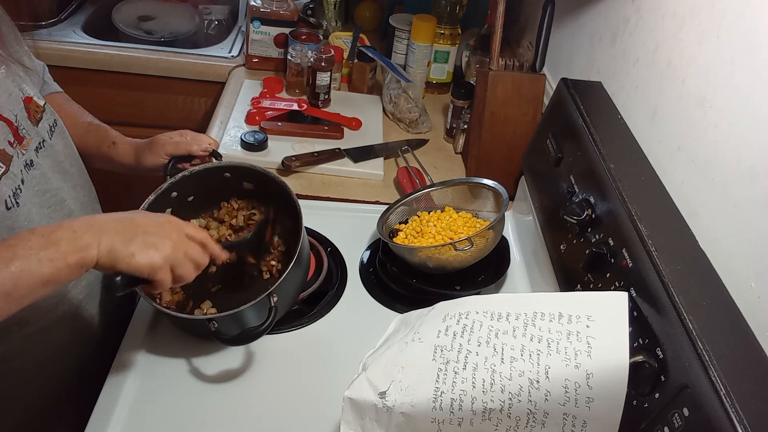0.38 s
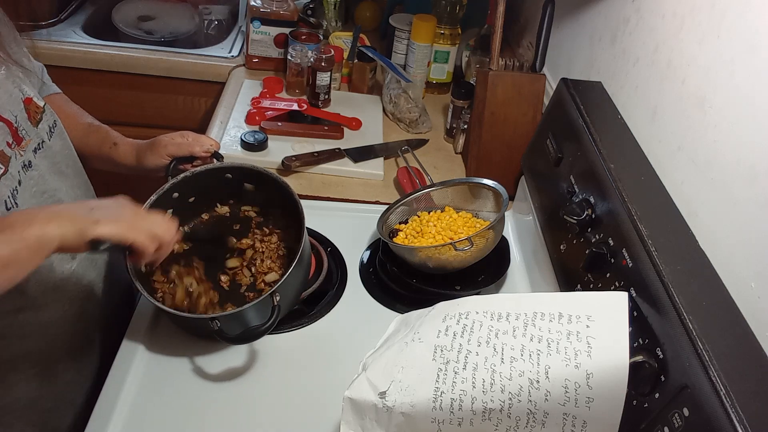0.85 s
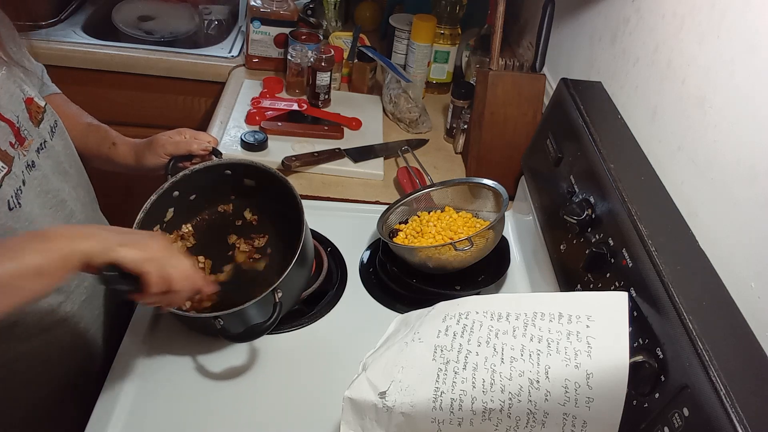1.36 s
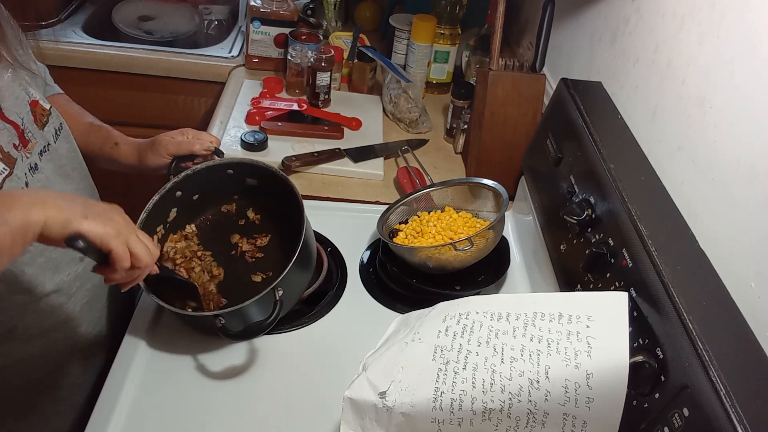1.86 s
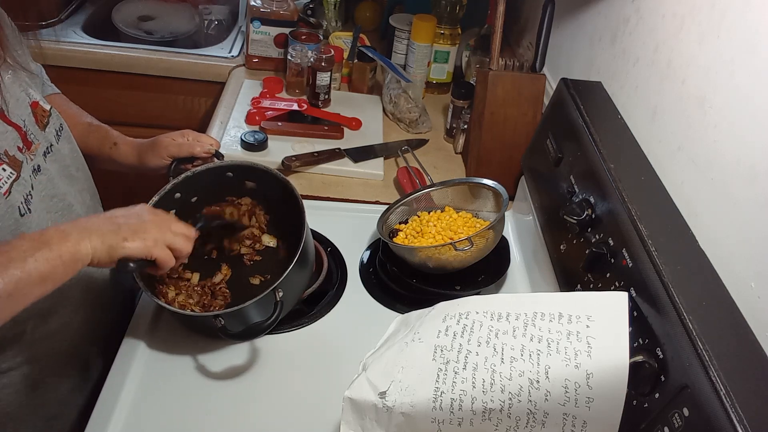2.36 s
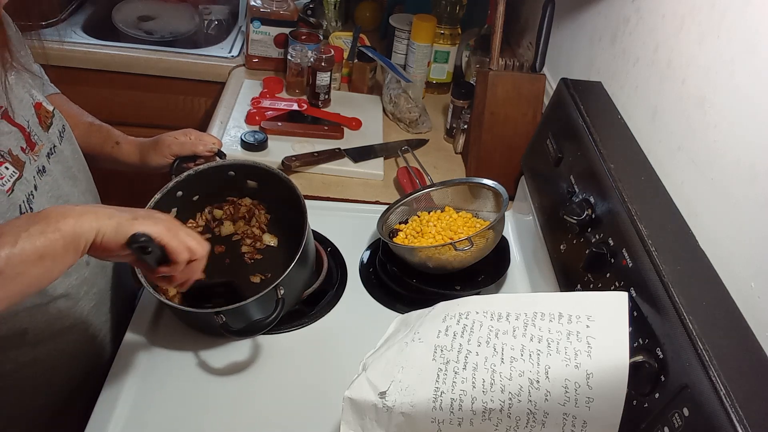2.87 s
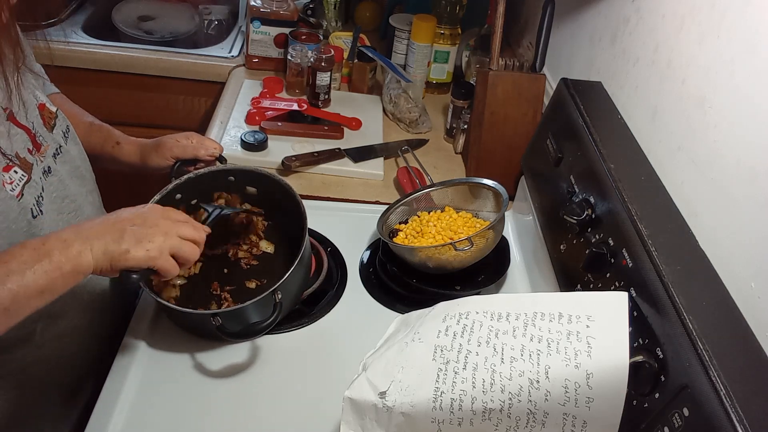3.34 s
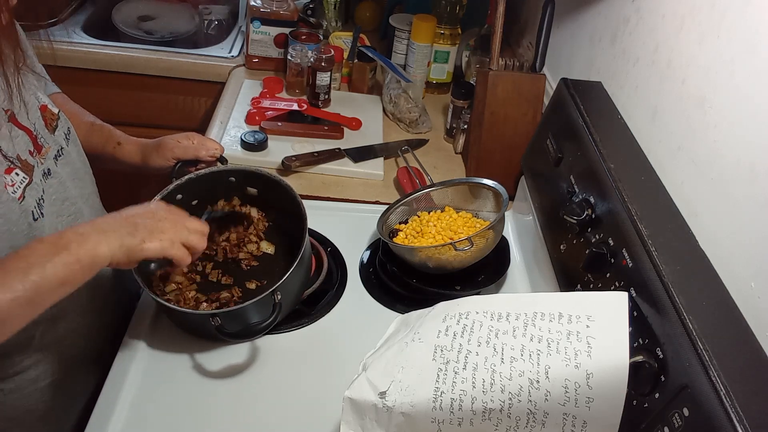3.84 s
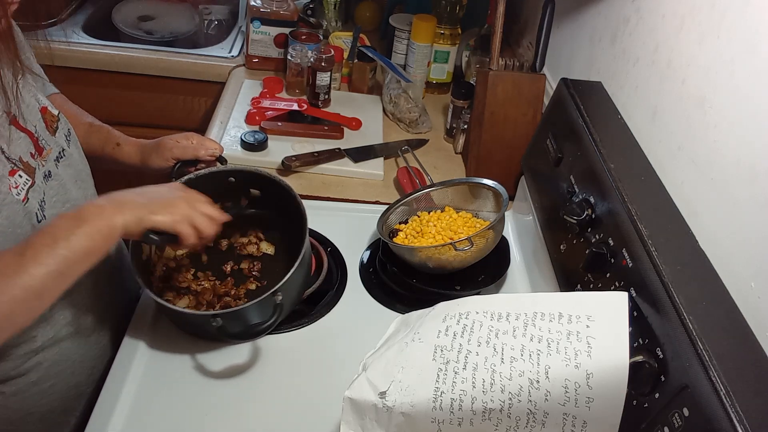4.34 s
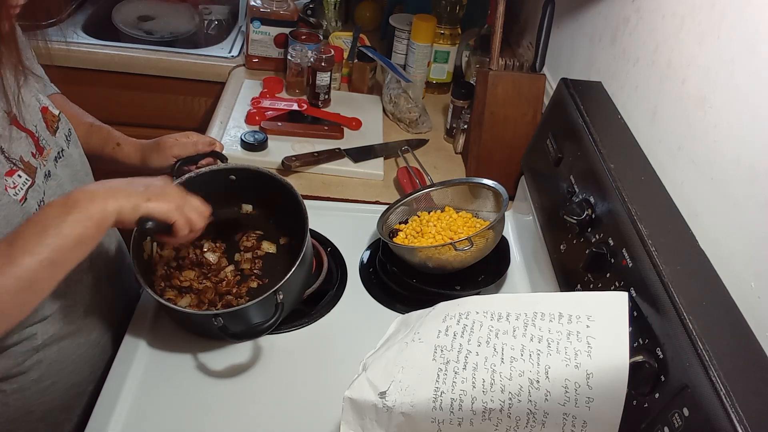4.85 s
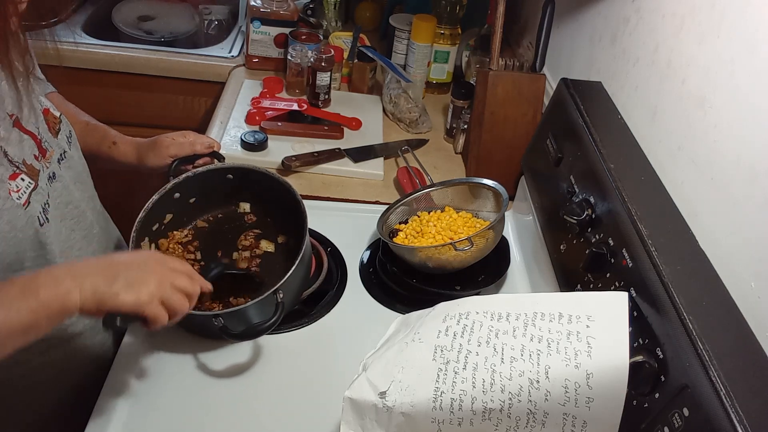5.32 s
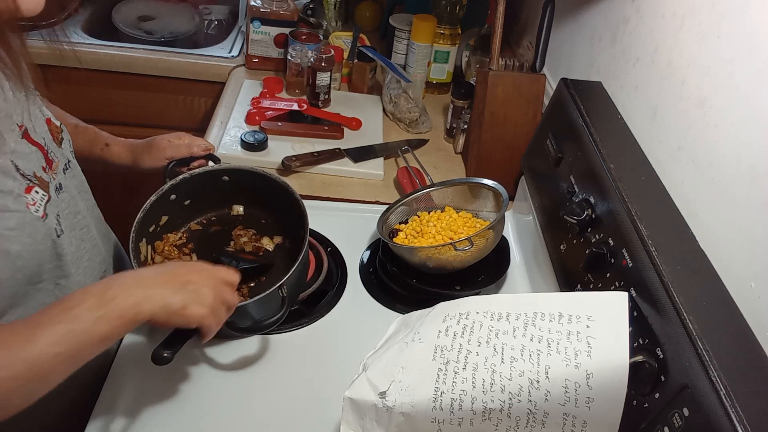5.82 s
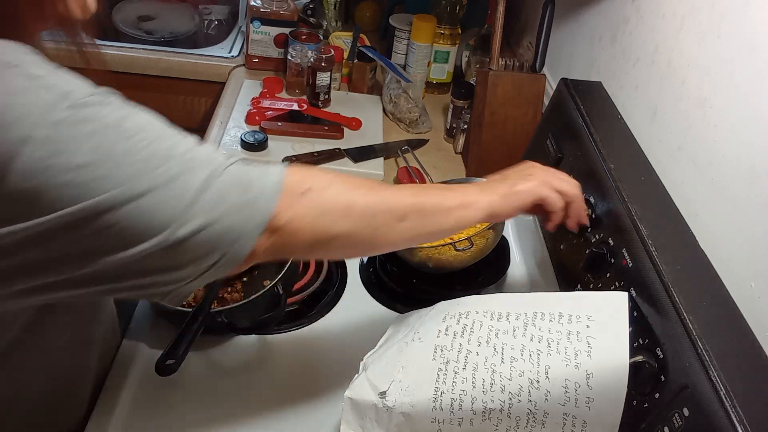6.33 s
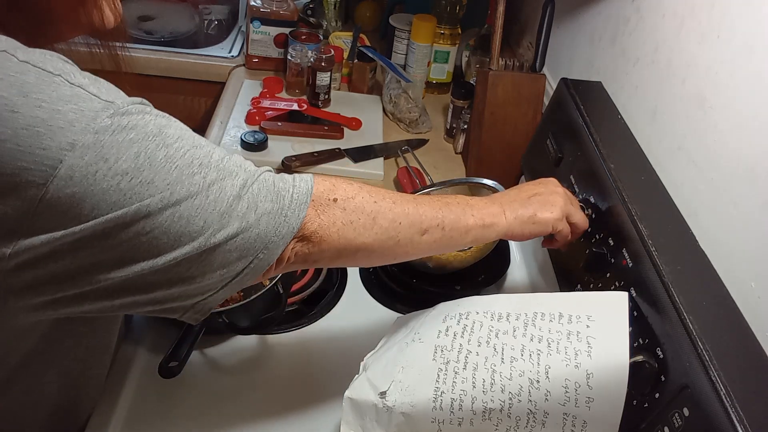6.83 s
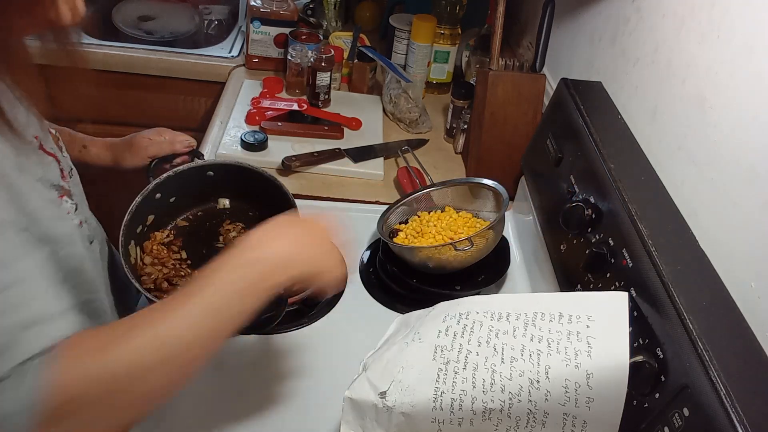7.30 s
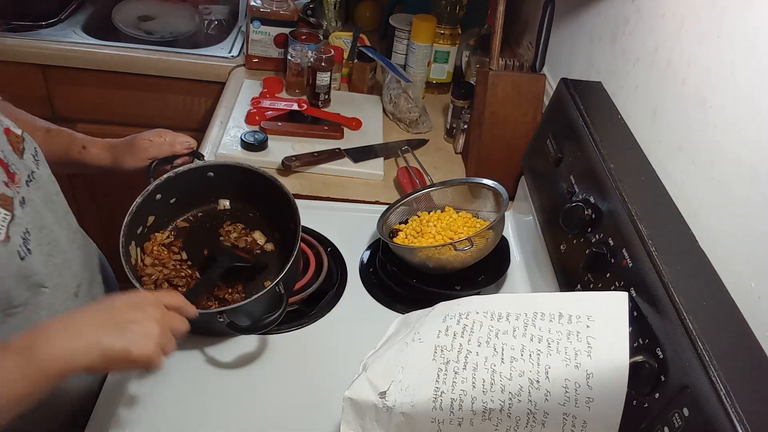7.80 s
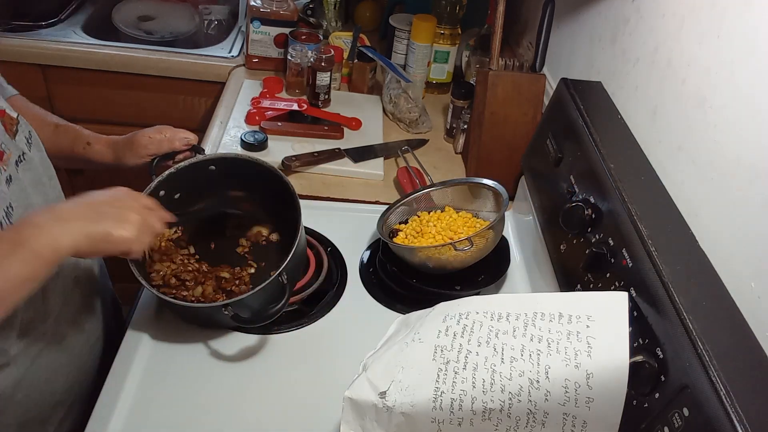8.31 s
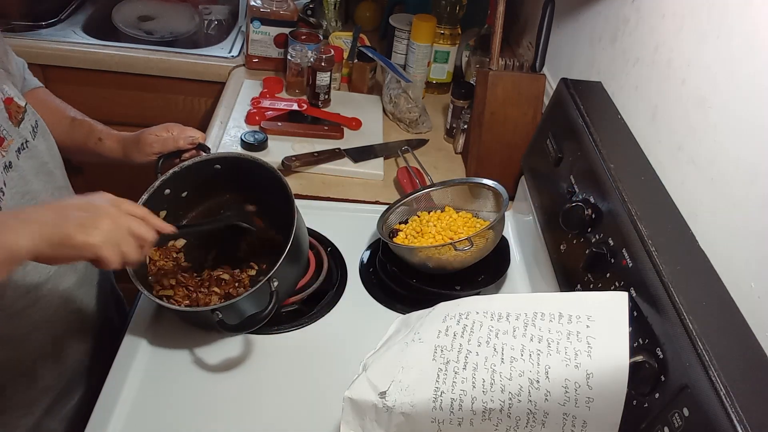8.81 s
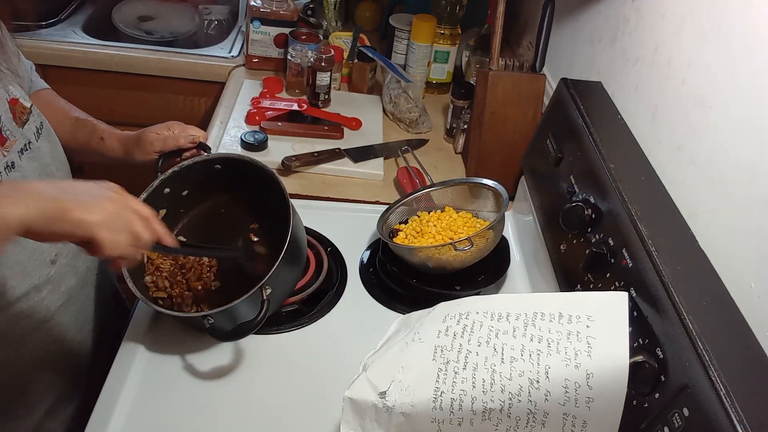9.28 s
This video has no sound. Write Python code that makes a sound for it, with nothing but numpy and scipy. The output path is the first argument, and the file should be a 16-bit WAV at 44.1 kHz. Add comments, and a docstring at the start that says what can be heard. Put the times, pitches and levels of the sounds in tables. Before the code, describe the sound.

Close stereo in a small hard kitchen. A plastic spoon stirs frying onions in a steel pot, with short rasping drags, hollow mid-low knocks and faint stove rumbles. Light patchy sizzle flares and spits at each turn. After six seconds it nearly stops, with tiny ticks at a knob, then a few softer strokes resume.

```python
"""A spoon stirs onions and spices in a steel pot on a kitchen stove, heard close by in stereo.
Noise made of tiny slips is the spoon dragging; struck resonances are its knocks on the pot, whose
hollow rings near 520 Hz. Jolts through stove resonances rock the pot on the hob.
Patchy noise is the sizzling oil and short bursts are its spits.
Fading noise echoes make a small hard kitchen, and a low hum lies underneath."""
import sys
import numpy as np
from scipy import signal
from scipy.fft import rfft, irfft, next_fast_len
from scipy.io import wavfile
from scipy.ndimage import uniform_filter1d, map_coordinates

SR = 44100
rng = np.random.default_rng(int(sys.argv[2]) if len(sys.argv) > 2 else 0)


def how_loud(loudness_db):
    """Turn decibels into a plain amplitude multiplier (0 dB gives 1, 20 dB gives 10)."""
    steps = np.asarray(loudness_db, float) / 20
    return 10 ** steps


def generate_wav(signal):
    """Clip the signal to [-1, 1] and save it as 16-bit WAV at the path in sys.argv[1]."""
    frames = np.transpose(np.atleast_2d(signal))
    scaled = np.clip(frames, -1, 1) * 32767
    pcm = np.round(scaled).astype(np.int16)
    wavfile.write(sys.argv[1], SR, pcm)


N = 415422  # length in samples


def unit(x):
    """Scale to rms 1."""
    return x / np.sqrt(np.mean(x ** 2) + 1e-20)


def peak(x):
    """Scale to peak 1."""
    return x / np.abs(x).max()


def along(points, hz):
    """Read a curve of (Hz, value) points on a log frequency axis."""
    f, v = np.transpose(points)
    return np.interp(np.log(hz + 1), np.log(f + 1), v)


def wobble(rate):
    """A smooth random curve with rate knots a second."""
    knots = rng.standard_normal(int(N * rate / SR) + 4)
    return map_coordinates(knots, [np.arange(N) * rate / SR])


def filtered(x, response):
    """Shape x by a complex response of frequency."""
    n = x.shape[-1]
    m = next_fast_len(n + 8192)
    return irfft(rfft(x, m) * response(np.fft.rfftfreq(m, 1 / SR)), m)[..., :n]


def resonance(hz, centre, width):
    """One causal resonance, with gain 1 at its centre."""
    return 1j * hz * width / (centre ** 2 - hz ** 2 + 1j * hz * width)


def body(modes):
    """The response of an object that rings at several (Hz, width, dB) modes, with alternating signs."""
    return lambda hz: sum((-1) ** k * how_loud(db) * resonance(hz, centre, width)
                          for k, (centre, width, db) in enumerate(modes))


def spread(pair, alike):
    """Mix two unrelated signals into left and right, as alike at each frequency as the curve says."""
    turn = lambda hz: np.arccos(np.clip(along(alike, hz), -1, 1)) / 2
    mid, side = filtered(pair, lambda hz: np.array([np.cos(turn(hz)), np.sin(turn(hz))]))
    return np.array([mid + side, mid - side])


def grit(density, scatter_db):
    """Tiny slips of uneven size at random times, density a second."""
    slips = rng.random(N) < density / SR
    return unit(slips * rng.standard_normal(N) * how_loud(scatter_db * rng.exponential(size=N)))


def patchy(x, depth_db, bins, frames):
    """Make a sound uneven with random gains in patches of frequency and time."""
    z = signal.stft(x, nperseg=512)[2]
    field = rng.standard_normal(z.shape[-2:])
    field = uniform_filter1d(uniform_filter1d(field, bins, 0), frames, 1)
    return signal.istft(z * how_loud(depth_db * unit(field)), nperseg=512)[1][..., :N]


def swells(rows, rise, fall, rest_db):
    """Gains of movements that climb, hold and die away over a resting level; one per dB column."""
    t = np.arange(0, N + 64, 64) / SR
    rows = np.array(rows)
    start = rows[:, :1]
    end = start + np.abs(rows[:, 1:2])
    climb_db = -rise * np.clip(start - t, 0, None)
    die_db = -fall * np.clip(t - end, 0, None)
    shape = how_loud(climb_db + die_db)
    # overlapping movements add as powers
    power = how_loud(rows[:, 2:]).T ** 2 @ shape ** 2 + how_loud(np.array(rest_db))[:, None] ** 2
    return [np.interp(np.arange(N) / SR, t, np.sqrt(p)) for p in power]


def add(track, s, sound):
    """Mix a sound into the track at s seconds."""
    part = track[round(s * SR):][:len(sound)]
    part += sound[:len(part)]


def ring(response, t, contact):
    """A rough push, strongest after contact seconds, makes a body ring."""
    push = rng.standard_normal(len(t)) * t * np.exp(-t / contact)
    return peak(filtered(push, response))


# Tone colour of the hum. Each row: frequency in Hz, relative level in dB.
HUM_COLOUR = [(18, -33.5), (30, -14.5), (48, 1), (75, 2), (97, 8), (118, 4.5), (152, -19), (249, 0.5),
              (304, -34.5), (427, -8.5), (538, -12.5), (678, -11), (755, 0), (895, -17), (1200, -20),
              (1560, -39), (2640, -120)]
# Likeness of left and right in hum and sizzle. Each row: frequency in Hz, likeness (1 = the same).
DIFFUSE_LIKENESS = [(60, 0.83), (180, -0.25), (550, -0.49), (1650, -1.4), (4970, 0.2), (15000, -0.13)]


def hum():
    """The low murmur of household machines: coloured noise that slowly wavers."""
    noise = filtered(rng.standard_normal((2, N)), lambda hz: how_loud(along(HUM_COLOUR, hz)))
    level_db = -79.5 + 1.3 * wobble(4.0)
    return how_loud(level_db) * unit(spread(noise, DIFFUSE_LIKENESS))


# How long the room rings. Each row: frequency in Hz, time in seconds to die by 60 dB.
ROOM_DECAY = [(100, 0.057), (500, .36), (2000, 0.24), (6000, 0.21), (14000, 0.24)]
# Likeness of left and right in the echoes. Each row: frequency in Hz, likeness (1 = the same).
ECHO_LIKENESS = [(60, .88), (300, 0.54), (700, 0.35), (1500, 0.054), (5000, 0.0035)]


def kitchen(x):
    """Room echoes: each quarter second gets a fresh noise tail, fading at its own speed per frequency."""
    step, delay = SR // 4, 110  # samples
    pair = np.zeros((2, N + 2 * SR))
    for start in range(-step, N, step):
        # overlapping fades hand over from one tail to the next
        fade = np.hanning(2 * step)[max(-start, 0):]
        piece = x[max(start, 0):][:len(fade)]
        hz, t, z = signal.stft(rng.standard_normal((2, SR // 2)), SR, nperseg=256)
        decay = how_loud(-60 * t / along(ROOM_DECAY, hz)[:, None])
        tail = signal.istft(z * decay, SR, nperseg=256)[1]
        tail = tail / np.linalg.norm(tail[0])
        wet = signal.fftconvolve((piece * fade[:len(piece)])[None], tail, axes=1)
        pair[:, max(start, 0) + delay:][:, :wet.shape[1]] += wet
    return spread(pair[:, :N], ECHO_LIKENESS)


# Sound that arrives by the first bounces. Each row: frequency in Hz, share from 0 to 1.
BOUNCE_SHARE = [(500, .05), (1200, 0.39), (4000, 0.79), (9000, .4)]


def nearby(x):
    """The straight path, later on the left, plus quick bounces off pot wall, hob and worktop."""
    left_lag = 4.1  # samples
    bounce_s = 0.011  # time for the bounces to die by 60 dB
    t = np.arange(SR // 50) / SR
    # the bounces differ from microphone to microphone
    taps = rng.standard_normal((2, len(t))) * how_loud(-60 * t / bounce_s)
    taps = taps / np.linalg.norm(taps, axis=1, keepdims=True)
    bounced = signal.fftconvolve(x[None], taps, axes=1)[:, :N]
    share = lambda hz: np.clip(along(BOUNCE_SHARE, hz), 0, 1)
    lag = lambda hz: np.exp(-2j * np.pi * hz / SR * np.array([[left_lag], [0]]))
    straight = filtered(x, lambda hz: np.sqrt(1 - share(hz) ** 2) * lag(hz))
    return straight + filtered(bounced, share)


# Tone colour of the sizzle as the microphone hears it.
# Each row: frequency in Hz, relative level in dB.
SIZZLE_COLOUR = [(600, -31), (900, -22.5), (1200, -17.5), (1400, -11), (1800, -11.5), (2800, -6.5),
                 (4700, -5.5), (6000, -2), (6900, -4.5), (8000, -10), (9500, -7.5), (13800, -6.5),
                 (14500, 0), (15400, 4), (16200, -27.5)]
# Steady frying, cooling as the heat is turned down. Each row: time in seconds, level in dB.
HEAT_LEVEL = [(0, -55), (1.1, -55), (1.85, -62), (2.3, -55), (3.499, -58), (4.799, -60), (5.4, -65),
              (6.5, -65), (7.2, -65), (7.9, -62.5), (8.8, -63), (9.42, -66)]
# Wet food turned onto hot steel flares up.
# Each row: start in seconds, time held in seconds, level in dB, dying in dB per second.
FOOD_FLARES = [(.04, .01, -54.5, 35), (0.383, 0.0086, -58, 295), (.44, .01, -53, 55), (.58, .05, -49, 59),
               (.72, .1, -52.5, 69), (1.3, .25, -54.5, 48.5), (2.12, .03, -61.5, 59), (2.53, .02, -50, 85),
               (2.82, .02, -57, 58), (3.22, 0.022, -49, 62.5), (3.68, .01, -52, 63.5),
               (4.1, .01, -52.5, 86), (4.45, .03, -59.5, 51), (4.55, .02, -52.5, 70),
               (4.96, .02, -49.5, 73.5), (5.31, .01, -59, 82), (5.52, .01, -60, 64.5),
               (5.62, .01, -53.5, 148.5), (5.72, .01, -66, 203), (5.79, .04, -60.5, 53),
               (5.94, .01, -62, 59.5), (6.07, .01, -65.5, 102.5), (6.26, .01, -66.5, 78),
               (8.4, .16, -53, 200), (8.77, .01, -67, 103.5), (9.075, .01, -50, 188.5),
               (9.23, .01, -61, 71)]


def sizzle():
    """Countless bursting bubbles: patchy hiss with sparse crackle, louder where food is turned."""
    pair = np.array([rng.standard_normal(N) + 0.36 * grit(400, 0.83) for _ in range(2)])
    pair = patchy(pair, 1.1, bins=8, frames=8)
    coloured = filtered(pair, lambda hz: how_loud(along(SIZZLE_COLOUR, hz)))
    hiss = unit(spread(coloured, DIFFUSE_LIKENESS))
    rows = np.array(FOOD_FLARES)
    rise_db_per_s = 257
    flares, = swells(rows[:, :3], rise_db_per_s, np.abs(rows[:, 3:]), [-120])
    steady = how_loud(np.interp(np.arange(N) / SR, *np.transpose(HEAT_LEVEL)))
    flicker = how_loud(0.92 * wobble(25))
    return flicker * np.hypot(steady, flares) * hiss


# Spits of oil and ticks of the spoon edge.
# Each row: start in seconds, peak of the lower part in dB, treble in dB relative to that part.
OIL_SPITS = [(.0595, -32, -8), (0.4229, -32.5, 4), (.5864, -35.5, -9.5), (.708, -29.5, -6.5),
             (.769, -38, 1), (1.8845, -48, -2), (2.481, -46, 8), (2.742, -51, -8), (2.783, -42, 0),
             (2.816, -25.5, -7), (2.822, -26.5, -12.5), (3.076, -45, 1), (3.2015, -23.5, -6),
             (3.2134, -33, -14.5), (3.2334, -36.5, -4.5), (3.618, -47.5, 4.5), (3.6624, -32, -4),
             (4.0836, -25.5, -11), (4.4433, -44.5, -1.5), (4.505, -32.5, -3), (4.88, -44.5, -2),
             (5.0704, -42, -2.6), (5.5474, -47.5, 3.5), (5.5677, -47.5, 3), (5.6127, -35.5, 4),
             (5.7109, -36, 4), (5.7147, -28.5, 1), (5.781, -32.5, -7.5), (6.0556, -33.5, 2),
             (6.2422, -54.5, .1), (6.5137, -36, -11.5), (7.64, -48, 1), (7.892, -51.5, 4.5),
             (8.2175, -40, -8.5), (8.3423, -33, -11), (8.759, -41, 2), (9.0673, -29.5, -2.5)]


def spits():
    """A sharp crack, then a short spray of droplets; each with its own share of treble."""
    crack_s, spray_s = 0.0024, 0.036  # times to die by 60 dB
    out, t = np.zeros(N), np.arange(SR // 8) / SR
    low_tone = lambda hz: resonance(hz, 6500, 11000) ** 2 / (1 + (hz / 7000) ** 8)
    high_tone = lambda hz: .5 * resonance(hz, 12000, 7300) ** 2 + 1.6 * resonance(hz, 15300, 1600)
    for s, db, treble_db in OIL_SPITS:
        fade = how_loud(-60 * t / crack_s) + 1.6 * how_loud(-60 * t / spray_s)
        burst = rng.standard_normal(len(t)) * fade
        lower = peak(filtered(burst, low_tone))
        upper = peak(filtered(burst, high_tone))
        add(out, s, how_loud(db) * (lower + how_loud(treble_db) * upper))
    return out


# Resonances of stove top (first four rows) and burner coil (the rest).
# Each row: frequency in Hz, width in Hz, relative level in dB.
HOB_MODES = [(52, 20, -13.5), (100, 10, 1.5), (161.2, 33, -0.5), (208, 31, -1), (279.3, 22, 3.5),
             (340, 61, 3), (435, 190, 0.5)]
# The pot shifting on the hob.
# Each row: start in seconds, time held in seconds, stove top level in dB, burner coil level in dB.
POT_SHIFTS = [(.015, 0.061, -57, -56.5), (1.4, .1, -99, -78.5), (1.636, 0.029, -45, -44),
              (1.72, 0.056, -58, -67), (2.03, 0.068, -79, -66), (3.2, 0.017, -86, -91),
              (4.22, 0.029, -64, -78), (4.49, 0.017, -86, -70.5), (4.56, 0.055, -51.5, -50.5),
              (4.72, 0.033, -66, -60.5), (4.91, 0.017, -66, -56), (5.285, 0.035, -56, -49),
              (5.34, 0.057, -68.5, -67), (5.79, 0.047, -77, -62), (5.93, 0.13, -62.5, -56),
              (6.52, .05, -70, -65), (6.58, .04, -59, -69), (6.66, 0.031, -67.5, -90),
              (8.0, 0.034, -72, -81), (8.342, 0.077, -53, -47.5), (8.96, 0.027, -62.5, -56),
              (9.395, .03, -58, -51)]
# The pot at rest: stove top level in dB, burner coil level in dB.
SETTLED_LEVEL = [-86.5, -87]


def rocking():
    """The pot's weight shifts in tiny jolts that rumble through the stove."""
    rise_db_per_s, fall_db_per_s = 1203.5, 204
    jolts = [grit(900, 1.2) * how_loud(1.5 * wobble(18)) for _ in range(2)]
    top = filtered(jolts[0], lambda hz: body(HOB_MODES[:4])(hz) / (1 + 1j * hz / 250) ** 2)
    coil = filtered(jolts[1], lambda hz: body(HOB_MODES[4:])(hz) * resonance(hz, 360, 250))
    top_gain, coil_gain = swells(POT_SHIFTS, rise_db_per_s, fall_db_per_s, SETTLED_LEVEL)
    return unit(top) * top_gain + unit(coil) * coil_gain


# Resonances of the pot's wall and bottom.
# Each row: frequency in Hz, width in Hz, relative level in dB.
POT_MODES = [(567.3, 16, -13.5), (668.4, 25, -4.5), (671.7, 73, -5.5), (838, 61, -9), (909, 40, -11.5),
             (1234, 64, -25.5), (1320, 27, -26), (1682, 55, -30), (1794, 30, -16.5), (2205, 170, -25),
             (2394, 37, -15.5), (2865, 540, -26), (3440, 37, -21), (3953, 30, -36), (4430, 46, -20),
             (4720, 79, -28.5), (5700, 63, -38.5), (6450, 74, -16.5)]
# Knocks of the spoon on the pot, and from 6.5 to 7.1 s of the hand at the stove's knob.
# Each row: time in seconds, peak of the hollow in dB, pitch of the hollow in Hz,
# then the wall's ring and the clack, both in dB relative to the hollow.
SPOON_KNOCKS = [(.014, -28.5, 508, -15.5, -23), (.365, -46.5, 526, -14, -19), (.561, -34.5, 546, -5, -14.5),
                (1.625, -18.5, 519, -11, -17.5), (2.419, -33, 534, -22, -34),
                (3.203, -40.5, 523, -5, -10.5), (4.502, -45.5, 540, -24, -2.5),
                (4.554, -26.5, 526, -16.5, -21), (4.722, -43.5, 502, -33, -14),
                (4.739, -49.5, 540, -30, -16.5), (4.906, -25.5, 546, -15, -18),
                (5.281, -12, 547.7, -10.5, -21.5), (5.304, -23, 553, -8, -24), (5.338, -26, 531, -1.5, -20),
                (5.714, -62, 526, 0, 26), (5.778, -21, 516, -24, -15), (5.924, -39.5, 502, -2.5, -3),
                (5.955, -51, 590, 4, 3), (5.988, -40, 504, -9, -13), (6.057, -39, 530, -3.5, -0.5),
                (6.242, -56, 564, 0, 12), (6.516, -53.5, 425, 7, 12.5), (6.552, -51, 427, 7.5, -1.5),
                (7.059, -71.5, 534, 13, 10), (7.777, -43, 537, -22, -32), (7.852, -56.5, 532, -27, -21),
                (8.306, -46, 496, -19, -19), (8.339, -29, 498, -9, -7), (8.352, -35, 482, -21, -3),
                (8.419, -31, 536, -12, -15), (8.845, -59, 507, -18, -18), (8.958, -30.5, 532, -38, -38),
                (9.045, -38, 529, -26, -30), (9.112, -34, 502, -8.5, -7), (9.4, -24.5, 471, -33, -21.5)]


def knocks():
    """A soft blow swells the hollow over a few cycles, rings the steel and thumps the hob."""
    thud_db = -32.5  # what a knock passes on to the hob, relative to the hollow
    out, t = np.zeros(N), np.arange(SR // 5) / SR
    wall_tone = lambda f: body(POT_MODES[:5])(f) * resonance(f, 620, 360)
    # the plastic spoon is soft: it drives little above 2 kHz
    soft = lambda f: resonance(f, 1700, 2100) / (1 + (f / 2200) ** 6)
    clack_tone = lambda f: (1.0 + how_loud(13.5) * body(POT_MODES[5:])(f)) * soft(f)
    thud_tone = lambda f: body(HOB_MODES)(f) / (1 + 1j * f / 500)
    for s, db, hz, wall_db, clack_db in SPOON_KNOCKS:
        hollow = peak(t ** 2 * np.exp(-t / 0.0033) * np.sin(2 * np.pi * hz * t))
        wall = how_loud(wall_db) * ring(wall_tone, t, 0.0036)
        clack = how_loud(clack_db) * ring(clack_tone, t, 0.0035)
        thud = how_loud(thud_db) * ring(thud_tone, t, 0.0087)
        # start 3 ms early, as the blow takes time to swell
        add(out, max(s - .003, 0), how_loud(db) * (hollow + wall + clack + thud))
    return out


# Tone colour of the spoon rubbing on steel. Each row: frequency in Hz, relative level in dB.
RASP_COLOUR = [(530, -35), (900, 2.5), (1430, 2.5), (2550, -6.5), (2720, -3.5), (3130, -8), (4100, -2),
               (8760, -17.5), (12000, -23.5), (15600, -48), (22000, -120)]
# Strokes of the spoon. Each row: start in seconds, time held in seconds, drag on the bottom in dB,
# low rub on the steel in dB, bright rasp of the edge in dB.
SPOON_STROKES = [(.04, 0.095, -56, -63.5, -58), (.62, 0.11, -59.5, -66, -65), (.75, 0.015, -51.5, -65, -58),
                 (.83, 0.01, -44.5, -49.5, -47), (.93, 0.08, -74, -72.5, -80), (1.13, .01, -62, -72, -80),
                 (1.27, 0.036, -62, -68.5, -50.5), (1.315, 0.016, -41, -52, -48),
                 (1.39, .04, -37, -51.5, -52), (1.46, 0.042, -38.5, -47, -52.5),
                 (1.54, 0.028, -47.5, -54.5, -61.5), (1.66, 0.0089, -43, -52, -76.5),
                 (2.08, 0.087, -67.5, -69.5, -65), (2.45, 0.016, -54.5, -75, -72),
                 (2.54, 0.065, -44.5, -54, -54), (2.7, 0.055, -73, -87, -73),
                 (2.86, 0.016, -70.5, -63, -50), (3.15, 0.014, -56, -77, -57.5),
                 (3.24, .04, -57.5, -67, -54), (3.64, 0.063, -57, -80, -62.5), (3.73, 0.035, -67, -92, -74),
                 (4.05, 0.042, -55.5, -75, -59.5), (4.41, .01, -62.5, -81, -69), (4.49, .01, -55, -71, -63),
                 (4.55, 0.027, -44.5, -55.5, -55.5), (4.86, .04, -54.5, -77, -57.5),
                 (4.95, 0.029, -43, -48.5, -52), (5.04, 0.033, -55, -69.5, -66.5),
                 (5.3, .03, -64, -61.5, -70), (5.4, 0.071, -49, -70, -75), (5.62, 0.015, -57, -71, -72),
                 (5.8, 0.028, -53, -58, -61.5), (5.92, 0.057, -66.5, -67, -67),
                 (6.13, .02, -61, -71.5, -87), (6.21, .01, -59, -80.5, -87), (6.55, 0.031, -84, -61, -64),
                 (7.85, .01, -64, -85, -79), (8.01, .01, -65, -69, -63.5), (8.21, 0.022, -61.5, -77, -70),
                 (8.27, 0.02, -53.5, -70, -59.5), (8.37, 0.075, -43, -58.5, -48),
                 (8.47, 0.098, -44, -53, -50.5), (8.99, 0.025, -66.5, -78, -85),
                 (9.06, 0.07, -46.5, -61.5, -52.5), (9.16, 0.033, -58, -84, -62)]
# The spoon lying in the food: drag, rub and rasp levels in dB.
IDLE_LEVEL = [-81.5, -80.5, -76]


def scrape():
    """Slips under the spoon drive the hollow and the steel; which modes answer shifts as it moves on."""
    rise_db_per_s, fall_db_per_s = 350, 304
    hollow_modes = lambda hz: resonance(hz, 525, 48) + how_loud(-8.5) * body(POT_MODES[:5])(hz)
    hollow = lambda hz: hollow_modes(hz) * resonance(hz, 572, 210)
    steel = lambda hz: how_loud(along(RASP_COLOUR, hz)) * (.35 + how_loud(21) * body(POT_MODES[5:])(hz))
    # splits the steel's sound into low rub and bright rasp
    pressed = lambda hz: 1 / (1 + (hz / 2600) ** 6)
    drag = filtered(grit(2500, 1.5) * how_loud(1.2 * wobble(35)), hollow)
    slips = patchy(grit(6000, 2.2) * how_loud(1.8 * wobble(40)), 2.5, bins=3, frames=14)
    rub = filtered(slips, lambda hz: steel(hz) * pressed(hz))
    rasp = filtered(slips, lambda hz: steel(hz) * (1 - pressed(hz)))
    gains = swells(SPOON_STROKES, rise_db_per_s, fall_db_per_s, IDLE_LEVEL)
    return sum(unit(layer) * gain for layer, gain in zip([drag, rub, rasp], gains))


def scene():
    """The pot's sound arrives straight, by bounces and by the room; sizzle and hum lie around it."""
    pot = knocks() + scrape() + rocking() + spits()
    # echo level: frequency in Hz, dB
    echo_db = [(150, -8.5), (550, -6.5), (1200, -1.4), (8000, -1.0)]
    wet = filtered(kitchen(pot), lambda hz: how_loud(along(echo_db, hz)))
    return nearby(pot) + wet + sizzle() + hum()


def band_limit(x):
    """A steep low-pass at the top of the band."""
    return signal.sosfilt(signal.butter(12, 16850, fs=SR, output="sos"), x)


def record(dry):
    """Weaken the sound by 15 dB from 15.7 kHz and remove it from 16.8 kHz."""
    band = filtered(dry, lambda hz: np.where(hz < 15700, 1, how_loud(-15.0) * (hz < 16800)))
    return band_limit(band)


dry = scene()
out = record(dry)
generate_wav(out)
```